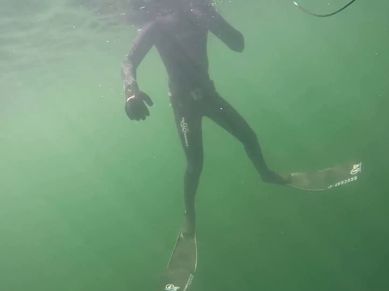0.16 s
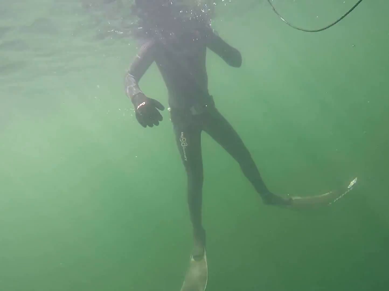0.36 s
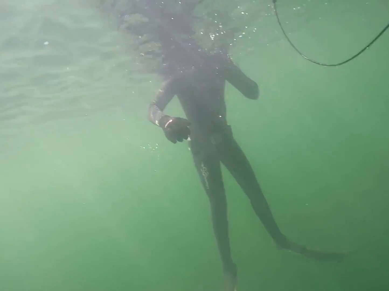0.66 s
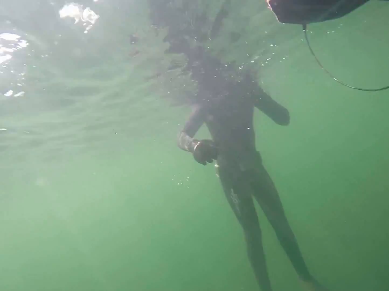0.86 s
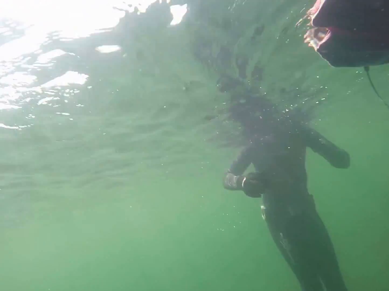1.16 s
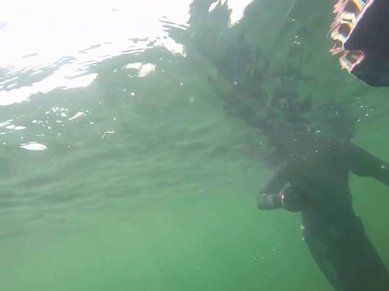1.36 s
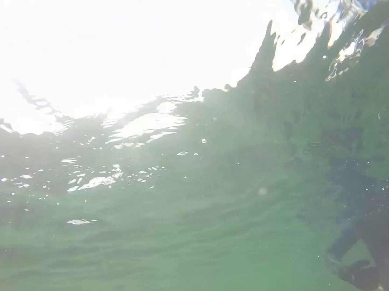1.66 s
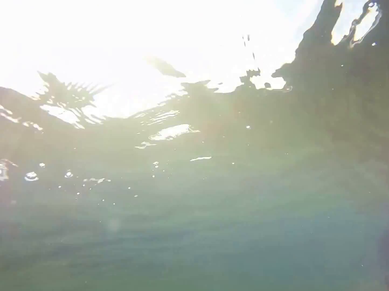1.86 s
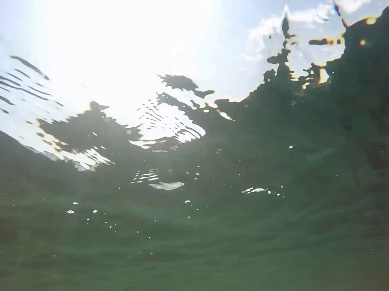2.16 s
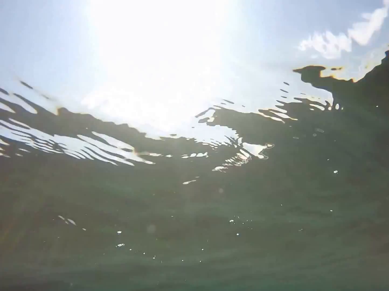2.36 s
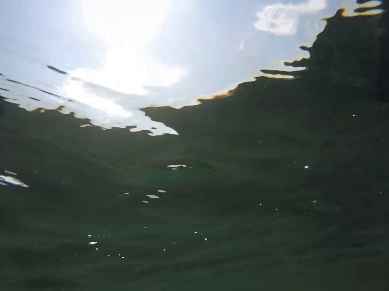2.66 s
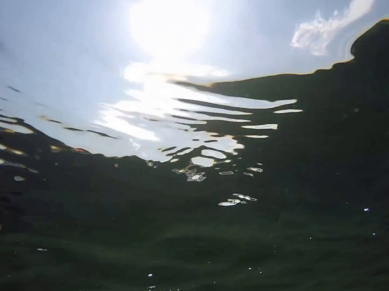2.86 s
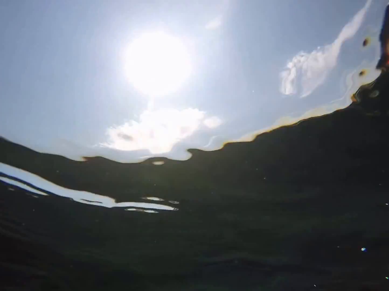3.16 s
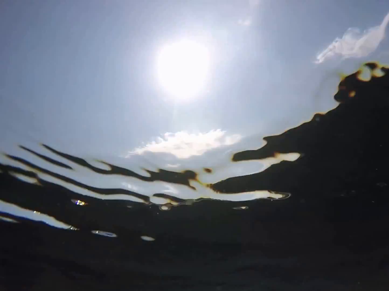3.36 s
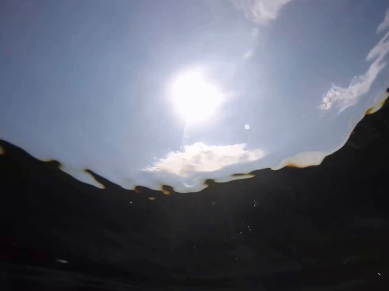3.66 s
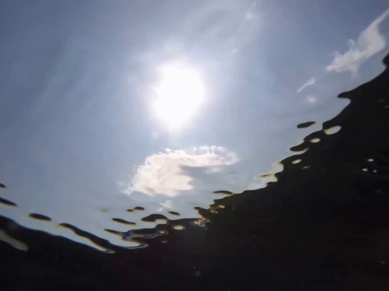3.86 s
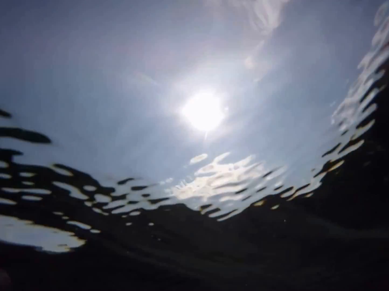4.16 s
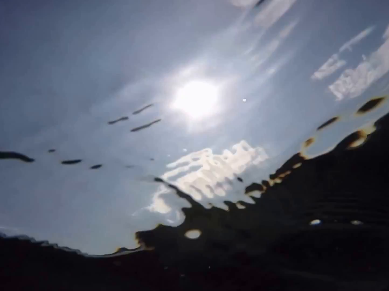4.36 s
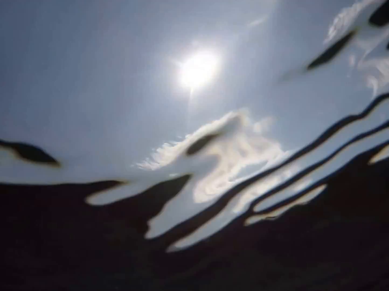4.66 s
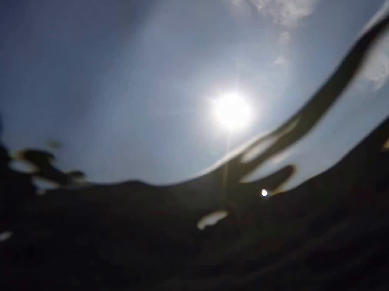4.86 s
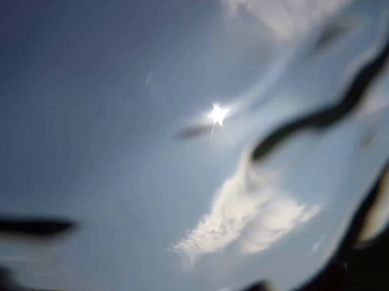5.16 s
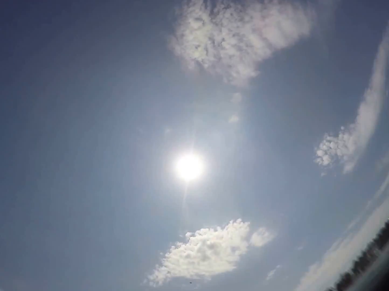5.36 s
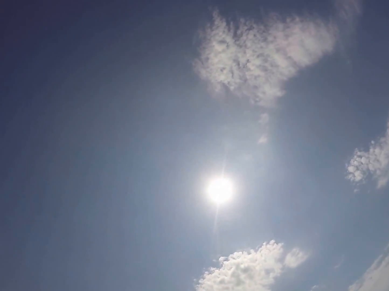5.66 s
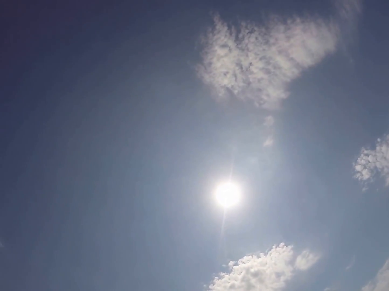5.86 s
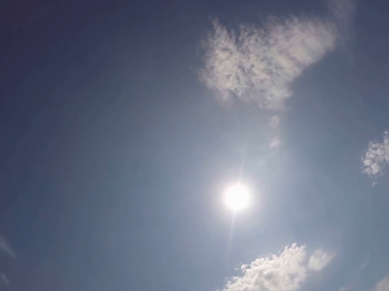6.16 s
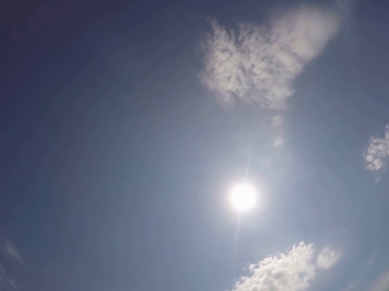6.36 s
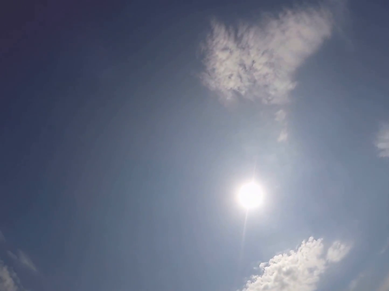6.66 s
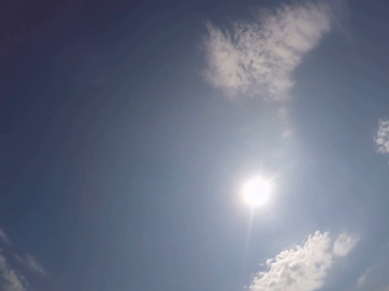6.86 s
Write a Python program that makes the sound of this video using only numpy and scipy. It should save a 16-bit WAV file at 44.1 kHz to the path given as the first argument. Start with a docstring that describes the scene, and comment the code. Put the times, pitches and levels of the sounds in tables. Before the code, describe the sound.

Under lake water beside a swimmer, a camera in a watertight case picks up dull rumble and a low, steady throb about two beats a second. A heavy muffled knock comes early, then rubs, gurgling surges and small knocks. A brief fizz of bubbles passes mid-way over a faint low wavering hum. A cluster of thumps and rubs marks the surfacing, then soft lapping and tiny drips.

```python
"""Lake, under water: a hand-held camera in a watertight case drifts up beside a swimmer and breaks the surface.
A deep throb, like the holder's pulse, beats about twice a second as pressure pulses.
Around it, shaped noise makes the rumble and gurgle of the flow, rubs, an airy swirl, ticks and microphone hiss.
Knocks are pulses with ringing case modes, bubbles are short rising pings, and a faint sine wavers.
At last wavelets lap softly: swells of noise with tiny pings, a click and two water drops."""
import sys
import numpy as np
from scipy import signal
from scipy.fft import rfft, irfft, next_fast_len
from scipy.io import wavfile
from scipy.ndimage import map_coordinates

SR = 44100
rng = np.random.default_rng(int(sys.argv[2]) if len(sys.argv) > 2 else 0)


def file_out(sig):
    """Save sig as 16-bit WAV at sys.argv[1]."""
    # one column per channel
    cols = np.atleast_2d(sig).T
    # limit, then scale
    lim = np.clip(cols, -1, 1)
    pcm = np.round(lim * 32767).astype(np.int16)
    wavfile.write(sys.argv[1], SR, pcm)


N = 308700
TOP_HZ = 15400  # band limit of the camera

# Beats in turn. Each row: deep push level in dB, leading flick level in dB.
BEATS = [(-21, -31.5), (-14, -28), (-14.5, -30), (-16.5, -36), (-18.5, -27.5), (-20, -25.5), (-21.5, -28.5),
         (-22, -28), (-21.5, -30), (-23.5, -28.5), (-20.5, -40), (-21.5, -37), (-30, -53)]
FIRST_BEAT_S, BEAT_S = 0.305, 0.5152
# Jolts of the case between beats, without a flick. Each row: time in seconds, push level in dB.
JOLT_EVENTS = [(1.611, -22), (2.118, -23)]

# Push of the flow on the case. Each row: time in seconds, rumble level in dB before the lift in flow().
FLOW_LEVEL = [(0.0, -44), (0.35, -39.5), (0.76, -41), (0.97, -35), (1.42, -43), (2.05, -34.5), (2.18, -35),
              (2.53, -44.5), (2.86, -44), (3.06, -50), (5.52, -45), (6.4, -47.5), (7.0, -53)]
# Rumble spectrum. Each row: frequency in Hz, relative density in dB per Hz.
RUMBLE_SPECTRUM = [(8.8, -49), (15, 9), (32, 2.5), (59, -2), (76, -6.5), (97, -11), (129, -19.5),
                   (150, -37.5), (200, -73), (330, -120)]
# Large-eddy spectrum. Each row: frequency in Hz, relative density in dB per Hz.
LARGE_EDDY_SPECTRUM = [(70, -19), (120, 2.5), (190, 2), (290, -2.5), (360, -10.5), (480, -32)]
# Small-eddy spectrum. Each row: frequency in Hz, relative density in dB per Hz.
SMALL_EDDY_SPECTRUM = [(230, -30), (340, 2.5), (460, -5), (620, -12), (1000, -21.5), (2500, -32.5),
                       (5000, -59)]
# Surges of water along the case. Each row: crest in seconds, large eddies in dB, small eddies in dB,
# rise in seconds, fall in seconds.
SURGE_EVENTS = [(.2, -46.5, -65, .4, 0.75), (1.05, -57.5, -65.5, 0.27, 0.35),
                (2.08, -53, -55.5, 0.19, 0.27), (2.75, -60, -68, 0.19, .22), (4.8, -54.5, -67, 0.31, 0.6),
                (7, -63.5, -74.5, 0.13, .2)]
CALM_LARGE_DB, CALM_SMALL_DB = -66.5, -76.5  # eddies between surges

# Knocks on the case. Each row: time in seconds, blow level in dB before the wall filter, pulse pitch in Hz,
# ring in dB relative to the blow.
KNOCK_EVENTS = [(1.0427, -15, 282, -14.5), (1.891, -39.5, 350, 0), (2.246, -30.5, 480, -1.5),
                (2.9134, -33, 230, -1.5), (2.9279, -36, 240, -3.5), (2.9559, -34.5, 310, 5),
                (3.7644, -33.5, 210, -13.5), (5.335, -25, 200, -5.5), (5.350, -20.5, 330, -5.5),
                (5.36, -25.5, 282, -6.5), (5.384, -30, 110, -16), (6.252, -41, 260, -8),
                (6.305, -48, 300, -8)]
# Modes of the case in the hand. Each row: frequency in Hz, mean relative level in dB, t60 in seconds.
CASE_MODES = [(77.8, 1, 0.13), (209, -3, 0.031), (360, -6.5, 0.032), (457, -2.5, 0.017)]
# Spectrum of the case shifting in the hand. Each row: frequency in Hz, relative density in dB per Hz.
JUDDER_SPECTRUM = [(60, 1), (120, 0), (190, -6), (350, -4), (480, -11.5), (650, -25)]

# Rubs on the case, and at 2.08 s an airy swirl of water. Each row: middle in seconds, level in dB,
# half length in seconds, scrape in dB and hiss in dB, both relative to that level.
STROKE_EVENTS = [(1.188, -63, 0.039, 4, -3.5), (1.537, -51.5, 0.022, -4.5, -14),
                 (1.621, -57.5, 0.023, -9, -13), (1.689, -51.5, .028, -4.5, -11),
                 (2.08, -65, .06, -14, -22), (5.247, -58, .023, -6, -17), (5.555, -52, .034, 1, -9.5),
                 (5.653, -53, 0.031, 0.5, -11), (5.758, -52, .039, -4.5, -8.5),
                 (5.958, -57, .029, -6.5, -16), (6.234, -51, .022, -11, -7.5)]
# Body of the strokes. Each row: frequency in Hz, relative density in dB per Hz.
STROKE_SPECTRUM = [(220, -10), (320, 2.5), (510, -4), (750, -10.5), (1150, -21), (1340, -18.5), (1600, -10),
                   (2000, -21), (4500, -26.5), (7000, -45)]
# Scrape spectrum. Each row: frequency in Hz, relative density in dB per Hz.
SCRAPE_SPECTRUM = [(500, -11), (750, 3), (950, 2.5), (1170, -1.5), (1350, -11), (1620, -9.5), (2000, -31)]
# Hiss of the strokes. Each row: frequency in Hz, relative density in dB per Hz.
STROKE_HISS_SPECTRUM = [(1500, 0.5), (2800, 4), (4800, 2.5), (6500, -15.5), (8000, -9.5), (10000, -10.5),
                        (13500, -14), (15500, -9)]
# Small ticks of the case, the last one a click of lapping water. Each row: time in seconds, peak in dB,
# centre in Hz.
TICK_AND_CLICK_EVENTS = [(.024, -45, 750), (2.835, -48, 620), (5.181, -49.5, 850), (5.181, -52, 2200),
                         (5.798, -48, 4300), (6.202, -46, 3200), (6.427, -46.5, 2020)]

# Single bubbles, and two water drops at the end. Each row: time in seconds, level in dB, starting pitch in Hz.
BUBBLE_AND_DROP_EVENTS = [(.852, -45.5, 2430), (1.126, -47.5, 8100), (1.185, -35, 6950),
                          (3.160, -46.5, 1730), (3.161, -49.5, 5780), (3.169, -48.5, 2600),
                          (3.191, -46, 3890), (3.212, -37, 3260), (3.289, -48, 2740), (3.339, -50, 2710),
                          (3.346, -54, 1451), (3.364, -47, 5300), (3.382, -48, 5870), (3.412, -41, 3350),
                          (3.498, -51.5, 5730), (6.627, -52, 997), (6.756, -49.5, 1820)]
CLOUD_S, CLOUD_HALF_S = 3.28, 0.085  # passing cloud of fine bubbles: middle, half length

TONE_START_S, TONE_END_S, TONE_FADE_S = 2.386, 3.62, 0.16
TONE_DB, TONE_SAG_DB_PER_S = -49, 7.5
TONE_HZ, SWING_HZ, SWING_LIFE_S, SWING_CREST_S = 218, 23, 0.89, 2.52

# Wavelets at the surface. Each row: crest in seconds, wash level in dB, rise in seconds, fall in seconds.
WAVELET_EVENTS = [(6.48, -64, 0.076, 0.27), (6.93, -58.5, .09, .2)]
# Lapping spectrum. Each row: frequency in Hz, relative density in dB per Hz.
LAP_SPECTRUM = [(500, -17), (900, -5), (1200, -1), (1400, -7), (1800, 1), (2500, -7), (3200, -7),
                (5000, -18.5), (8000, -27)]
# Microphone noise spectrum. Each row: frequency in Hz, relative density in dB per Hz.
HISS_SPECTRUM = [(350, -0.5), (600, -1), (810, -1), (980, -4), (1120, -4), (2280, -5), (2480, -3),
                 (2690, -4.5), (4390, -7), (10200, -14.5), (14000, -14.5), (15600, -21)]


def amp(db):
    """Decibels to gain."""
    return 10 ** (np.asarray(db) / 20)


def unit(x):
    """Scale to rms 1."""
    return x / np.sqrt(np.mean(x ** 2) + 1e-20)


def clock():
    """Time of every sample in seconds."""
    return np.arange(N) / SR


def curves(rows):
    """Interpolate each column after the time to one value per sample."""
    s, *columns = np.transpose(rows)
    return [np.interp(clock(), s, column) for column in columns]


def wobble(rate_hz):
    """Smooth random curve with rate_hz knots a second."""
    knots = rng.standard_normal(int(N * rate_hz / SR) + 4)
    return map_coordinates(knots, [clock() * rate_hz])


def swell(crest_s, rise_s, fall_s):
    """Smooth rise to 1 at the crest, then a smooth fall."""
    t = clock() - crest_s
    return np.exp(-(t / np.where(t < 0, rise_s, fall_s)) ** 2 / 2)


def filtered(x, response):
    """Multiply the spectrum of x by a response of frequency."""
    size = next_fast_len(N + SR // 2)
    hz = np.fft.rfftfreq(size, 1 / SR)
    return irfft(rfft(x, size) * response(hz), size)[:N]


def coloured(x, spectrum):
    """Shape x by (Hz, dB) points, falling steeply beyond them, at rms 1."""
    points_hz, points_db = np.transpose(spectrum)

    def response(hz):
        low_end = np.minimum(1, hz / points_hz[0]) ** 2
        high_end = np.maximum(1, hz / points_hz[-1]) ** 4
        shape_db = np.interp(np.log(hz + 1), np.log(points_hz), points_db)
        return low_end / high_end * amp(shape_db)

    return unit(filtered(x, response))


def noise(spectrum, grain_db=0, grain_rate_hz=100):
    """Coloured noise whose excitation comes in clumps."""
    clumps = amp(grain_db * wobble(grain_rate_hz))
    return coloured(rng.standard_normal(N) * clumps, spectrum)


def add(track, s, sound):
    """Mix a short sound into the track from time s."""
    part = track[max(0, round(s * SR)):][:len(sound)]
    part += sound[:len(part)]


def push(t, hz):
    """Soft pressure pulse around t = 0: the wall flexes in and back out."""
    u = (np.pi * hz * t) ** 2
    return (1 - 2 * u) * np.exp(-u)


def ping(hz, cycles=30, rise=0.018):
    """A bubble or drop rings, falling 30 dB in the given cycles, while its pitch climbs."""
    t = np.arange(SR // 30) / SR
    age = hz * t / cycles
    phase = 2 * np.pi * hz * t * (1 + rise * np.minimum(age, 1))
    onset = 1 - np.exp(-hz * t)
    return np.sin(phase) * amp(-30 * age) * onset


def throbs(push_hz=35, lead_s=0.02004, lead_hz=90, snap_hz=95, snap_db=-15,
           rebound_s=0.0376, rebound_hz=38, rebound_db=-7.0):
    """A beat is a small quick flick, then a deep push with pointed tip and rebound; a jolt has no flick."""
    out = np.zeros(N)
    t = np.arange(-SR // 10, SR // 5) / SR
    thud = push(t, push_hz)
    thud += amp(snap_db) * push(t, snap_hz)
    thud += amp(rebound_db) * push(t - rebound_s, rebound_hz)
    flick = push(t + lead_s, lead_hz)
    for beat, (db, flick_db) in enumerate(BEATS):
        s = FIRST_BEAT_S + beat * BEAT_S
        add(out, s + t[0], -amp(db) * thud - amp(flick_db) * flick)
    for s, db in JOLT_EVENTS:
        add(out, s + t[0], -amp(db) * thud)
    return out


def flow(rumble_lift_db=5):
    """Water shoves the case about; each surge sheds large and small eddies that gurgle along it."""
    shove_db, = curves(FLOW_LEVEL)
    large, small = amp(CALM_LARGE_DB), amp(CALM_SMALL_DB)
    for s, large_db, small_db, rise_s, fall_s in SURGE_EVENTS:
        surge = swell(s, rise_s, fall_s)
        large = np.hypot(large, amp(large_db) * surge)
        small = np.hypot(small, amp(small_db) * surge)
    rumble = amp(shove_db + rumble_lift_db) * noise(RUMBLE_SPECTRUM)
    gurgle = large * noise(LARGE_EDDY_SPECTRUM, grain_db=2, grain_rate_hz=60)
    ripple = small * noise(SMALL_EDDY_SPECTRUM, grain_db=3, grain_rate_hz=58)
    return rumble + gurgle + ripple


def knocks(wall_hz=690, shove_db=-13, judder_db=-9, judder_t60_s=0.086):
    """A blunt contact flexes and shoves the case, which rings briefly and judders in the hand."""
    out, loose = np.zeros((2, N))
    t = np.arange(-SR // 20, SR // 5) / SR
    after = np.maximum(t, 0)
    for s, db, hz, ring_db in KNOCK_EVENTS:
        blow = push(t, hz) + amp(shove_db) * push(t, 0.35 * hz)
        ring = np.zeros(len(t))
        for mode_hz, mode_db, t60_s in CASE_MODES:
            level_db = mode_db + rng.normal(0, 1.3)  # each knock excites the modes differently
            ring += amp(level_db - 60 * after / t60_s) * np.sin(2 * np.pi * mode_hz * after)
        add(out, s + t[0], amp(db) * (blow + amp(ring_db) * ring))
        shake = amp(db + ring_db + judder_db - 60 * after / judder_t60_s)
        add(loose, s + t[0], (t > 0) * shake)
    out += loose * noise(JUDDER_SPECTRUM)
    # the thick wall passes no treble
    return filtered(out, lambda hz: 1 / np.sqrt(1 + (hz / wall_hz) ** 20))


def rubs_and_swirl():
    """Short strokes of grainy noise swell and fade: friction on the case, and one airy swirl of water."""
    body, scrape, hiss = np.zeros((3, N))
    for s, db, half_s, scrape_db, hiss_db in STROKE_EVENTS:
        stroke = amp(db) * np.exp(-np.abs((clock() - s) / half_s) ** 3 / 2)
        body += stroke
        scrape += amp(scrape_db) * stroke
        hiss += amp(hiss_db) * stroke
    return (body * noise(STROKE_SPECTRUM, grain_db=1.5, grain_rate_hz=400)
            + scrape * noise(SCRAPE_SPECTRUM, grain_db=2.5, grain_rate_hz=330)
            + hiss * noise(STROKE_HISS_SPECTRUM, grain_db=4, grain_rate_hz=580))


def ticks_and_click(half_width=0.29, t60_s=0.011):
    """Case ticks and a water click: noise bursts around one pitch that start at once and die quickly."""
    out = np.zeros(N)
    t = np.arange(SR // 16) / SR
    for s, db, hz in TICK_AND_CLICK_EVENTS:
        edges_hz = np.clip(hz * np.exp([-half_width, half_width]), 20, SR / 2 - 100)
        band = signal.butter(2, edges_hz, "band", fs=SR, output="sos")
        burst = signal.sosfilt(band, rng.standard_normal(len(t)) * amp(-60 * t / t60_s))
        add(out, s, amp(db) * burst / np.abs(burst).max())
    return out


def bubbles_and_drops(fizz_db=-57.0, fizz_hz=4700, spread=0.45, scatter_db=3.5, fizz_cycles=16, count=110):
    """Single bubbles and two water drops ring, and a small cloud of finer bubbles crackles past."""
    out = np.zeros(N)
    for s, db, hz in BUBBLE_AND_DROP_EVENTS:
        add(out, s, amp(db) * ping(hz))
    places = rng.uniform(-1, 1, count)
    for place, (size, pitch) in zip(places, rng.standard_normal((count, 2))):
        s = CLOUD_S + CLOUD_HALF_S * place
        hz = min(fizz_hz * np.exp(spread * pitch), TOP_HZ)
        add(out, s, amp(fizz_db + scatter_db * size) * ping(hz, cycles=fizz_cycles))
    return out


def tone(waver_db=1.0):
    """A faint sine dies away while its pitch swings once a beat, less and less."""
    t = clock()
    age_s = np.maximum(t - TONE_START_S, 0)
    swing_hz = SWING_HZ * np.exp(-age_s / SWING_LIFE_S)
    hz = TONE_HZ + swing_hz * np.cos(2 * np.pi * (t - SWING_CREST_S) / BEAT_S)
    gate = np.clip(np.minimum(age_s, TONE_END_S - t) / TONE_FADE_S, 0, 1)
    level_db = TONE_DB - TONE_SAG_DB_PER_S * age_s + waver_db * wobble(16)
    return gate * amp(level_db) * np.sin(2 * np.pi * np.cumsum(hz) / SR)


def lapping(drop_db=4, drop_hz=1900, spread=0.75, scatter_db=6, count=40):
    """Above the surface, wavelets wash and throw tiny drops, louder where the wash is stronger."""
    power = np.zeros(N)
    for s, db, rise_s, fall_s in WAVELET_EVENTS:
        power += (amp(db) * swell(s, rise_s, fall_s)) ** 2
    wash = np.sqrt(power)
    drops = np.zeros(N)  # relative to the wash
    for place, size, pitch in rng.uniform(-1, 1, (count, 3)):
        s = np.interp(place, [-1, 1], [WAVELET_EVENTS[0][0], N / SR])
        add(drops, s, amp(drop_db + scatter_db * size) * ping(drop_hz * np.exp(spread * pitch)))
    return wash * (noise(LAP_SPECTRUM, grain_db=2.0, grain_rate_hz=150) + drops)


def microphone_hiss(level_db=-66.5):
    """Steady coloured noise of the microphone."""
    return amp(level_db) * noise(HISS_SPECTRUM)


def scene():
    """Sum the case, water and microphone sounds into one channel."""
    body = throbs() + flow() + knocks()
    details = rubs_and_swirl() + ticks_and_click() + bubbles_and_drops() + tone() + lapping()
    return (body + details + microphone_hiss())[None]


def record(dry):
    """The camera keeps nothing above its band limit."""
    return filtered(dry[0], lambda hz: hz < TOP_HZ)[None]


dry = scene()
out = record(dry)
file_out(out)
```